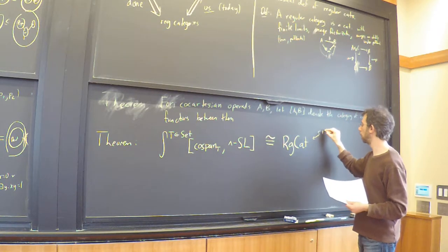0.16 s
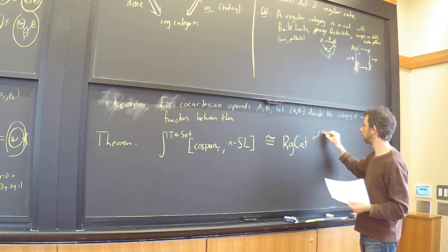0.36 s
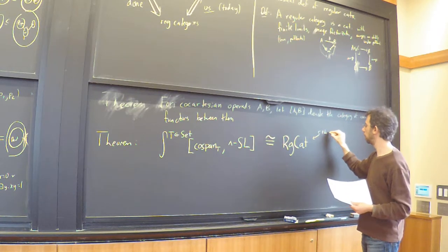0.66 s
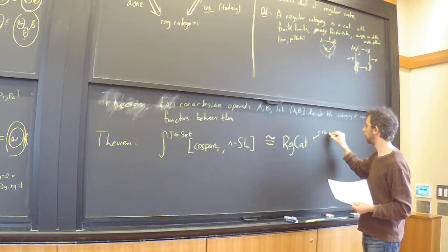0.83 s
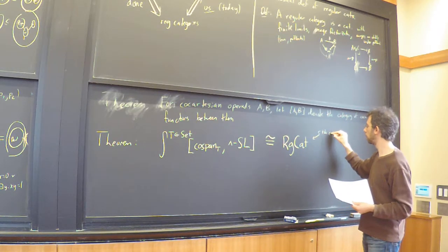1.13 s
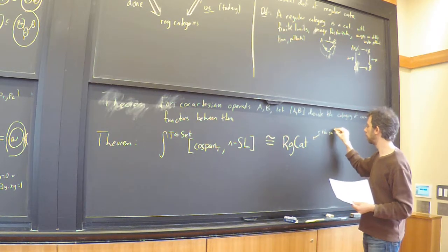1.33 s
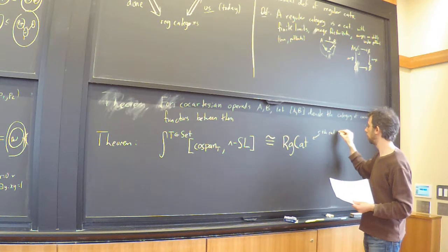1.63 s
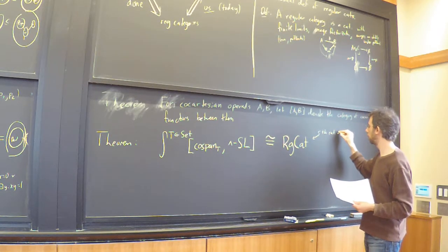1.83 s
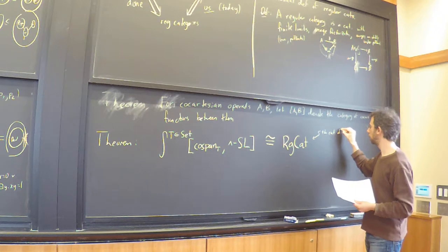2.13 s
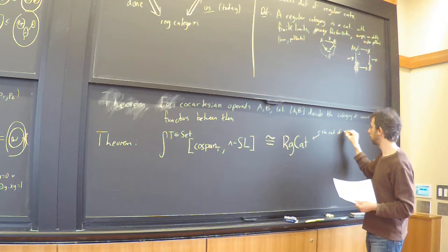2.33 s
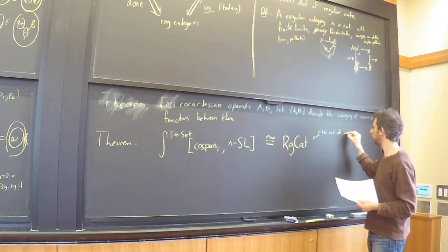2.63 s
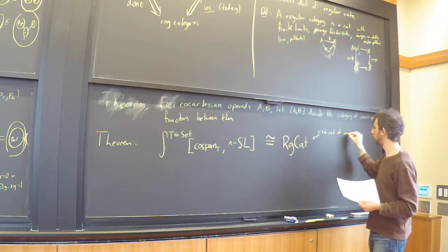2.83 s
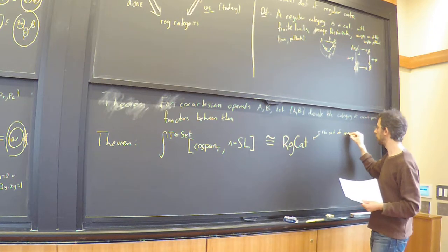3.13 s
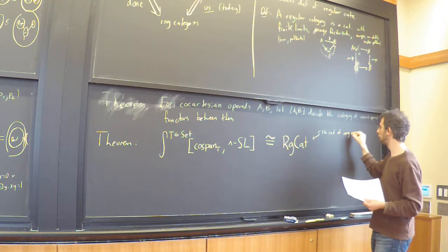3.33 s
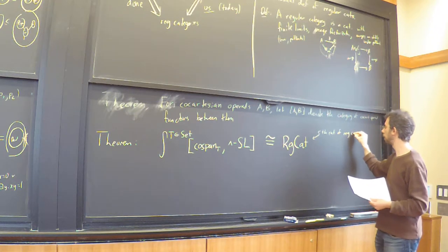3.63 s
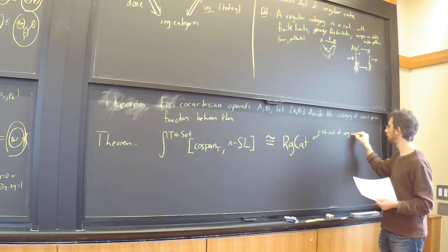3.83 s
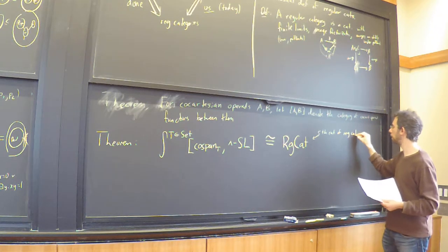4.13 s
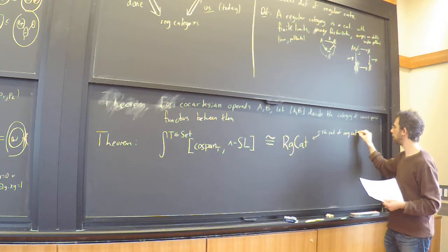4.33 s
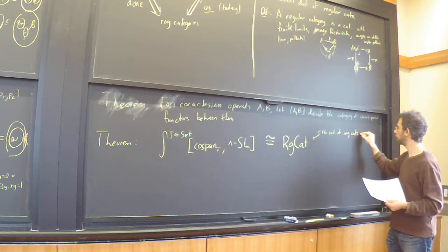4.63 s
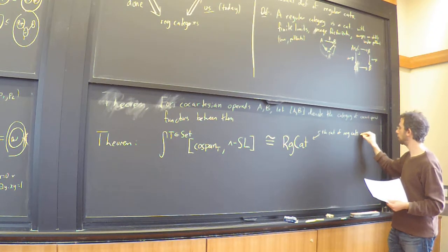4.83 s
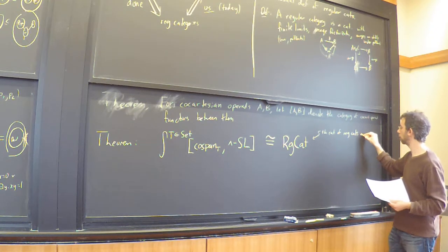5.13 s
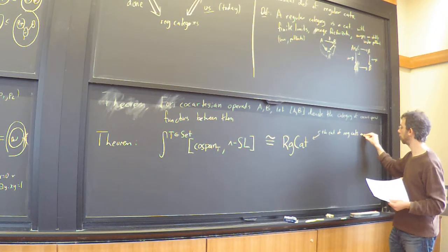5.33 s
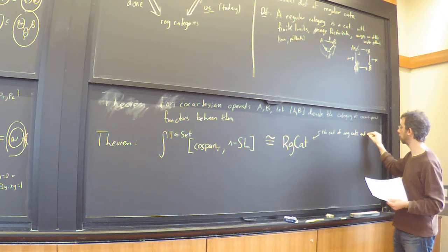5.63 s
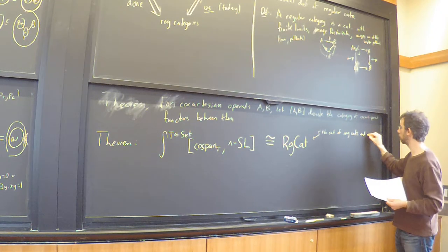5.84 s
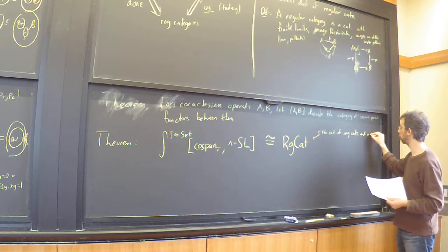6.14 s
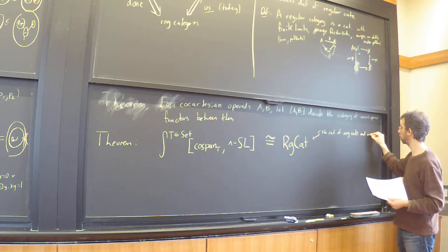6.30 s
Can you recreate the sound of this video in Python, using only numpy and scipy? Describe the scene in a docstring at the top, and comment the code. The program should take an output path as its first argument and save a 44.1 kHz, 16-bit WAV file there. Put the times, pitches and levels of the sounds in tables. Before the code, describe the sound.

Chalk chatters briefly on a large blackboard, then ticks in an uneven rhythm as someone writes small letters, with faint gritty strokes between the taps. A soft footfall comes early. Past the middle, the board knocks once in its frame, and a light, bright chalk swish follows. The taps sit slightly to the right and ring briefly in a lecture room, over steady, low ventilation.

```python
"""Chalk chatters briefly, then ticks: someone writes small letters on a large sliding blackboard in a
lecture room. Each touch-down is an impact that sends a bending wave through the panel, which scatters
and dies away in the room. Faint gritty strokes follow, made by friction. A soft footfall passes,
the panel knocks once in its frame, and ventilation runs throughout."""
import sys
import numpy as np
from scipy import signal
from scipy.fft import rfft, irfft
from scipy.io import wavfile

SR = 44100
rng = np.random.default_rng(int(sys.argv[2]) if len(sys.argv) > 2 else 0)


def wav_record(signal):
    """Record a signal, one row per channel, as 16-bit PCM in the file named by sys.argv[1]."""
    frames = np.transpose(np.atleast_2d(signal))
    bounded = np.clip(frames, -1, 1)
    # unit amplitude maps onto the largest positive 16-bit level
    quanta = np.round(bounded * 32767).astype(np.int16)
    wavfile.write(sys.argv[1], SR, quanta)


N = 285194
T = np.arange(N) / SR
AGE = T[:SR * 3 // 4]  # time since an impact [s]

# chalk touch-downs: (time [s], level [dB], resonance of the spot [Hz], edge = share near 3 kHz [dB],
# hardness = treble share [dB], stay on the board [s], rubbing level [dB])
TAPS = [(0.117, -12, 1290, -16.5, -23.5, .1, -59), (0.26, -26, 1630, -16.5, -34, 0.39, -64),
        (0.81, -16, 1720, -20, -37, 0.16, -61), (0.999, -21, 1550, -24.5, -46, .28, -61.5),
        (1.359, -16, 2170, -15, -29.5, .12, -62), (1.552, -16, 1490, -19, -37.5, .09, -61),
        (1.729, -16, 1670, -19.5, -32.5, 0.19, -62.5), (1.978, -26, 1700, -17.5, -46, .2, -61.5),
        (2.26, -14.5, 1720, -13.5, -32, .07, -60), (2.413, -16, 1690, -17.5, -27.5, 0.52, -64),
        (2.974, -15, 1560, -22, -35, 0.31, -61.5), (3.454, -14, 1640, -19.5, -31.5, 0.17, -59.5),
        (3.669, -18, 1380, -22, -36, .3, -61.5), (4.082, -14.5, 2300, -14, -27, .1, -56),
        (4.29, -16, 1400, -17, -35.5, 0.22, -58.5), (4.727, -22.5, 1770, -15.5, -29.5, .47, -63),
        (5.319, -15, 1710, -19, -31, 0.27, -62), (5.747, -14.5, 1740, -15.5, -26.5, 0.45, -65),
        (6.247, -19, 1640, -26.5, -40, .2, -66)]
# long modes of the whole panel: (frequency [Hz], level [dB], t60 [s])
PANEL_MODES = [(235.2, -9.5, 0.39), (338, -13, 0.37), (484, 0.5, 0.25), (602, -8, 0.28), (790, -0.5, 0.2),
               (883, -13, 0.24), (965, -5.5, 0.29), (1220, -26, 0.61), (1400, 1.5, 0.18),
               (1520, -5.5, 0.28), (1720, -10, 0.44), (2118, -10, 0.26), (2270, -17, 0.28),
               (2900, -16, 0.22)]


def chalk_taps(travel_s=0.00169, detune=0.024, shared_echo=0.55, tick_db=-11, wave_db=-3, panel_db=-12):
    """Impact excitation: the tick comes straight through the air, then the bending wave, then echoes."""
    # quickly damped resonances under the chalk: (frequency [Hz], level [dB], t60 [s])
    contact_modes = [(309, -23, 0.052), (550, -10, 0.0095), (842, -8, 0.02), (1390, -3.5, 0.014),
                     (1669, 0.5, 0.022), (2300, -4, 0.0069), (2810, -0.5, 0.0034), (5250, -20.5, 0.0088)]
    # spectrum of the contact click: (frequency [Hz], level [dB])
    tick_spectrum = [(250, -17), (500, 1.5), (950, 20), (1700, 2), (3500, -8), (5200, -12.5), (7200, -19),
                     (9200, -4), (12000, -24), (16000, -21)]
    # spectrum of the reflections: (frequency [Hz], level [dB])
    echo_spectrum = [(60, -26.5), (200, -15), (450, -7), (850, -4), (1550, -1), (2000, -4), (2450, -9),
                     (3000, -11), (4400, -22), (5500, -23), (7500, -31), (12000, -36.5), (16000, -50)]
    out = np.zeros((2, N))
    *own_echoes, common_echo = [diffuse(echo_spectrum, early_db=5, early_t60=0.033, rise_s=0.0027)
                                for _ in range(len(TAPS) + 1)]
    click = (AGE == 0) + 0.054 * rng.standard_normal(len(AGE)) * fade(0.012)
    tick = unit_hit(colour(click, tick_spectrum))
    mean_edge, mean_hardness = np.mean(np.array(TAPS)[:, 3:5], axis=0)
    for (start, level, spot_hz, edge, hardness, *_), own_echo in zip(TAPS, own_echoes):
        # every spot has slightly different resonances and echoes
        nearby = [(hz * (1 + detune * rng.standard_normal()), db, t60) for hz, db, t60 in contact_modes]
        spot = modes([(spot_hz, -3, .02)], delay_s=0.001025)
        wave = unit_hit(disperse(modes(nearby) + spot, travel_s))
        echo = np.sqrt(shared_echo) * common_echo + np.sqrt(1 - shared_echo) * own_echo
        # each mode is struck nearer to or further from a node; the light stick hardly moves the low ones
        bass_loss = [(250, 25), (500, 11), (900, 2)]
        struck = [(hz, db + 3 * rng.standard_normal() - at(bass_loss, hz), t60)
                  for hz, db, t60 in PANEL_MODES]
        panel = unit_hit(disperse(modes(struck), travel_s=.006))
        direct = undb(tick_db) * tick + undb(wave_db) * wave + undb(panel_db) * panel
        hit = pan(-2.7) * direct + pan(-.5) * echo
        # a harder, shorter contact keeps more treble
        bright_db = hardness - mean_hardness
        edge_db = 0.82 * (edge - mean_edge) + 0.17 * bright_db
        touch = [(500, -0.07), (1500, 0.015), (3200, edge_db), (8000, 0.72 * bright_db)]
        add(out, start + .0005, undb(level) * colour(hit, touch))
    return out


def chalk_strokes(catch_db=-5, catch_spread_db=5, catches_per_s=30):
    """Sliding friction: faint scraping along each letter, duller chatter where the stick catches."""
    # the stick grazes the board just before it lands: (time [s], level [dB], length [s])
    grazes = [(.972, -52, 0.014)]
    # the chalk catches hard: (time [s], level [dB], length [s])
    hard_catches = [(.001, -44.5, 0.032), (2.083, -45.5, 0.018), (3.16, -57, 0.078), (3.256, -43, 0.008),
                    (3.28, -51, 0.026), (6.45, -52.5, .02)]
    # spectrum of the scraping: (frequency [Hz], level [dB])
    grit_spectrum = [(300, -8), (1000, -1), (1700, 2), (3000, -2), (4200, -4), (5400, 1), (7300, -2),
                     (9500, 1), (13500, 1.5), (16000, -10)]
    # a catch is a soft push that mostly stirs the panel's midrange: (frequency [Hz], level [dB])
    catch_spectrum = [(60, -28), (450, -10), (900, -5), (1500, 1), (2300, -6), (3100, -15), (4400, -25),
                      (7500, -33), (16000, -47)]
    speed = hand_speed()
    scrape = friction(speed + gestures(grazes), grit_spectrum, grain_db=2.5, flutter_db=2)
    light_catches = speed * undb(catch_db + catch_spread_db * drift(catches_per_s))
    chatter = friction(light_catches + gestures(hard_catches), catch_spectrum, grain_db=4, flutter_db=.5)
    return scrape + chatter


def hand_speed(rest_s=0.031, stroke_s=0.0947, lift_s=.02, turn_share=0.38, pressure_spread_db=-0.2):
    """Oscillating motion drives the friction: after each touch-down the hand swings until it lifts."""
    speed = np.zeros(N)
    for start, *_, stay_s, rub_db in TAPS:
        age = T - start
        touching = np.clip(np.minimum(age, stay_s - age) / lift_s, 0, 1)
        swing = np.sin(np.pi * (age - rest_s) / stroke_s) ** 2
        speed += undb(rub_db) * touching * (turn_share + (1 - turn_share) * swing)
    return speed * undb(pressure_spread_db * drift(1 / stroke_s))


def gestures(table):
    """Transient drive: the speed rises and falls once in each brief contact."""
    return sum(undb(db) * np.sqrt(np.abs(np.sin(np.pi * np.clip((T - start) / length, 0, 1))))
               for start, db, length in table)


def friction(speed, spectrum, grain_db, flutter_db, direct_db=-4, room_db=-0.5, room_t60=0.52):
    """Friction noise: grains break off in uneven clicks, heard directly and through the room."""
    grains = rng.standard_normal(N) * undb(grain_db * rng.exponential(size=N).clip(0, 8))
    grains = speed * unit_rms(grains * undb(flutter_db * drift(90)))
    direct = unit_rms(colour(1. * (AGE == 0), spectrum))
    room = unit_rms(noise(spectrum, len(AGE)) * (fade(room_t60) + 2 * fade(0.054)))
    response = (undb(direct_db) * direct + undb(room_db) * room) / np.sqrt(len(AGE))
    return signal.fftconvolve(grains[None], response, axes=1)[:, :N]


def chalk_swish(start_s=5.325, length_s=0.426, attack_s=0.096, release_s=.035, level_db=-51.5):
    """Friction under steady pressure: one long line gives a bright, broadband swish."""
    # spectrum of the sliding chalk: (frequency [Hz], level [dB])
    swish_spectrum = [(500, -6), (1600, -3), (3000, -4), (5200, -1), (7200, -2.5), (9500, -1.5),
                      (12500, -5), (16000, -17)]
    age = T - start_s
    pressure = np.clip(age / attack_s, 0, 1) * np.exp(-np.maximum(age - length_s, 0) / release_s)
    return undb(level_db) * pressure * noise(swish_spectrum, N) * undb(.8 * drift(150))


def frame_knock(start_s=4.4448, ring_db=-13, body_db=-13, snap_db=-21, snap_lag_s=0.00099):
    """Free vibration after impact: the panel bumps its frame with a snap, and its low modes ring out."""
    # spectrum of the knock's reflections: (frequency [Hz], level [dB])
    body_spectrum = [(80, -18), (230, -0.5), (450, 6), (650, 1), (950, 4.5), (1550, -1.5), (2600, -5.5),
                     (5000, -17), (11000, -15.5), (16000, -28)]
    out = np.zeros((2, N))
    body = diffuse(body_spectrum, early_db=0, early_t60=0.069, rise_s=0.0038)
    # a broad, soft contact drives the high modes less
    treble_loss = [(500, -1), (1400, 4.5), (2500, 10)]
    pushed = [(hz, db - at(treble_loss, hz), t60) for hz, db, t60 in PANEL_MODES]
    ring = unit_hit(disperse(modes(pushed), travel_s=0.001997))
    add(out, start_s, pan(-1.4) * (undb(ring_db) * ring + undb(body_db) * body))
    snap_spectrum = [(1000, 3), (4000, 2), (7000, -8), (10000, 1.5), (16000, -5)]
    snap = unit_hit(noise(snap_spectrum, len(AGE)) * AGE * fade(0.0052))
    add(out, start_s + snap_lag_s, pan(-1.7) * undb(snap_db) * snap)
    return out


def footfall(start_s=.661, thud_db=-29, boom_hz=60, boom_db=-29, boom_t60=0.68):
    """Structure-borne sound: the writer shifts weight with a soft thud, and the floor then resonates."""
    # spectrum of the thud: (frequency [Hz], level [dB])
    thud_spectrum = [(30, -14), (65, -4), (95, -9), (140, -2), (420, -3), (900, -7.5), (2000, -21),
                     (5000, -36), (16000, -55)]
    out = np.zeros((2, N))
    thud = diffuse(thud_spectrum, early_db=7, early_t60=0.044, rise_s=0.0028)
    boom = unit_hit(modes([(boom_hz, 0, boom_t60), (2 * boom_hz, -7, .3)], delay_s=0.0383))
    add(out, start_s, undb(thud_db) * thud + undb(boom_db) * boom)
    return out


def ventilation(air_db=-53):
    """Broadband flow noise and tonal fan noise: a steady rush of air with a wavering hum."""
    # spectrum of the moving air: (frequency [Hz], level [dB])
    air_spectrum = [(20, -6.5), (40, -1), (60, 1), (80, -4), (105, -1), (170, 0.5), (260, -5), (630, -9),
                    (1000, -12), (2000, -16.5), (4000, -23.5), (8000, -30), (13000, -29.5), (16000, -38)]
    # tones of the fan: (frequency [Hz], level [dB])
    fan_tones = [(102, -65), (133, -63), (204, -62.5)]
    hum = sum(undb(db + 3 * drift(4.6)) * np.sin(2 * np.pi * hz * T + 1.3 * drift(9))
              for hz, db in fan_tones)
    return noise(air_spectrum, N) * undb(air_db + .5 * drift(2.57)) + hum


def modes(table, delay_s=0.):
    """Modal superposition: damped sines start after a delay, neighbours in opposite phase."""
    age = np.maximum(AGE - delay_s, 0)
    return sum((-1) ** k * undb(db) * np.sin(2 * np.pi * hz * age) * fade(t60, age)
               for k, (hz, db, t60) in enumerate(table))


def disperse(x, travel_s):
    """Dispersion: bending-wave speed grows with the root of frequency; travel_s holds at 1.5 kHz."""
    phase_lag = 4 * np.pi * travel_s * np.sqrt(1500 * freqs(len(x)))
    return irfft(rfft(x) * np.exp(-1j * phase_lag), len(x))


def diffuse(spectrum, early_db, early_t60, rise_s):
    """Reverberation: a burst of reflections from the panel's edges, then the room's slower decay."""
    # decay of panel and room together: (frequency [Hz], t60 [s])
    decay_times = [(100, 0.64), (500, 0.36), (1400, 0.42), (3600, 0.39), (10000, 0.36)]
    size = len(AGE)
    centres_hz, t60s = np.transpose(decay_times)
    field = rfft(noise(spectrum, size))
    out = 0
    for t60, weights in zip(t60s, np.eye(len(t60s))):
        band = irfft(field * at(np.c_[centres_hz, weights], freqs(size)), size)
        out = out + band * (fade(t60) + undb(early_db) * fade(early_t60))
    build_up = 1 - np.exp(-(AGE / rise_s) ** 2)
    return unit_hit(out * build_up)


def noise(spectrum, size):
    """Partial coherence: coloured stereo noise that is partly alike left and right."""
    # likeness of the two sides in the diffuse field: (frequency [Hz], correlation [-1 to 1])
    coherence = [(30, 0.15), (70, 0.05), (200, 0.57), (700, .6), (1050, 0.28), (2800, 0.71), (5500, 0.56),
                 (8000, 0.23), (15000, 0.27)]
    mid, side = rfft(rng.standard_normal((2, size)))
    alike = at(coherence, freqs(size))
    stereo = mid * np.sqrt(1 + alike) + side * np.sqrt(1 - alike) * np.array([[1], [-1]])
    return unit_rms(irfft(stereo * undb(at(spectrum, freqs(size))), size))


def colour(x, spectrum):
    """Minimum-phase filtering: folding the cepstrum gives a causal response with this spectrum."""
    cepstrum = irfft(np.log(undb(at(spectrum, freqs(size=1024)))))
    half = len(cepstrum) // 2
    cepstrum[1:half] *= 2
    cepstrum[half + 1:] = 0
    response = irfft(np.exp(rfft(cepstrum)))
    return signal.fftconvolve(np.atleast_2d(x), response[None], axes=1)[:, :x.shape[-1]]


def fade(t60, age=AGE):
    """Exponential decay, 60 dB in t60 seconds."""
    return np.exp(-np.log(1000) * age / t60)


def drift(changes_per_s):
    """Random modulation with a spread near 1."""
    knots = rng.standard_normal(1024)
    return np.interp(T * changes_per_s, np.arange(len(knots)), knots)


def undb(db):
    """Decibels to amplitude gain."""
    return 10 ** (np.asarray(db) / 20)


def unit_rms(x):
    """Normalise to rms 1."""
    return x / np.sqrt(np.mean(x ** 2))


def unit_hit(x):
    """Normalise to the energy of one millisecond at full scale."""
    return unit_rms(x) * np.sqrt(SR / 1000 / x.shape[-1])


def at(points, hz):
    """Interpolate a table along a log-frequency axis."""
    table_hz, values = np.transpose(points)
    return np.interp(np.log(hz + 1), np.log(table_hz), values)


def freqs(size):
    """Fourier bin frequencies [Hz] for this many samples."""
    return np.fft.rfftfreq(size, 1 / SR)


def pan(db):
    """Stereo gains for a left-minus-right level difference."""
    return undb(np.array([[db], [-db]]) / 2)


def add(out, start_s, x):
    """Superpose a sound from a given time."""
    start = max(int(start_s * SR), 0)
    out[:, start:start + x.shape[-1]] += x[..., :N - start]


def scene():
    """Superposition of the impacts, the chalk's friction and the ventilation."""
    impacts = chalk_taps() + frame_knock() + footfall()
    rubbing = pan(-2.2) * (chalk_strokes() + chalk_swish())
    return impacts + rubbing + ventilation()


def record(dry, cutoff_hz=15600):
    """A steep elliptic low-pass removes the highest treble."""
    return signal.sosfilt(signal.ellip(8, .2, 70, cutoff_hz, fs=SR, output="sos"), dry)


dry = scene()
out = record(dry)
wav_record(out)
```